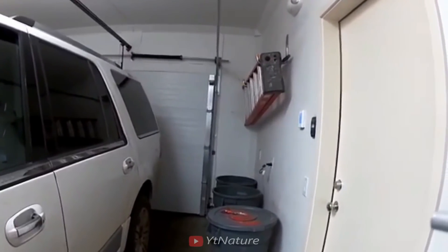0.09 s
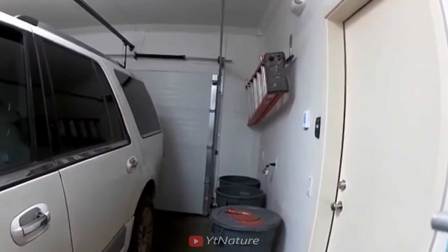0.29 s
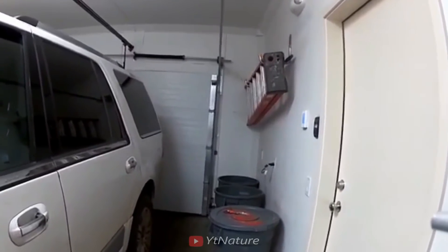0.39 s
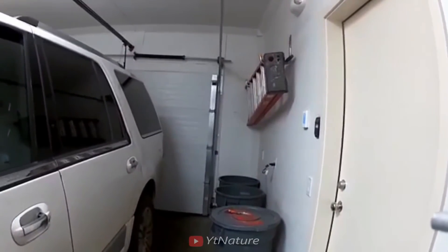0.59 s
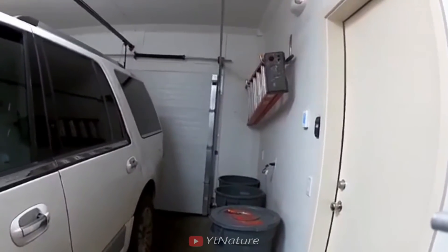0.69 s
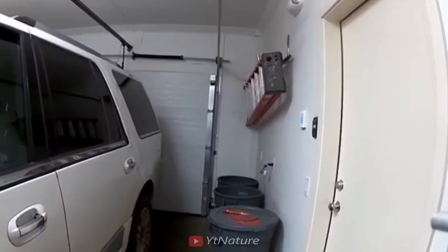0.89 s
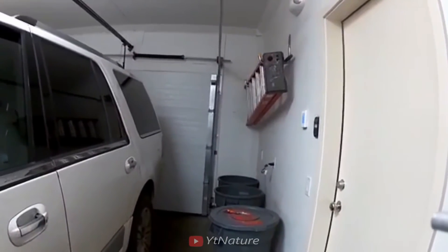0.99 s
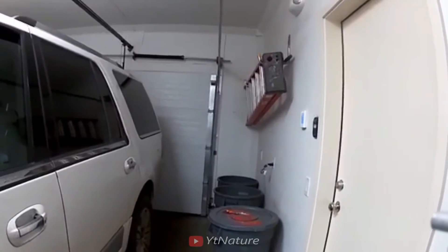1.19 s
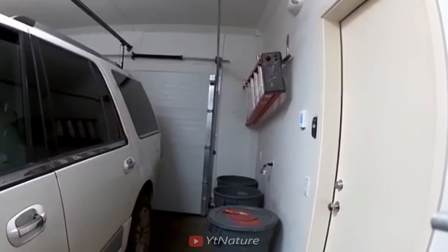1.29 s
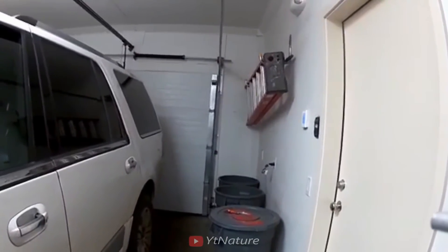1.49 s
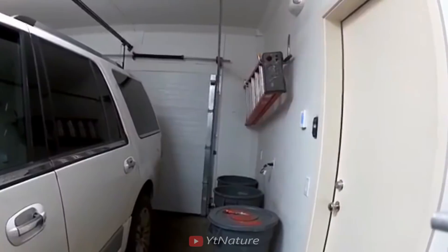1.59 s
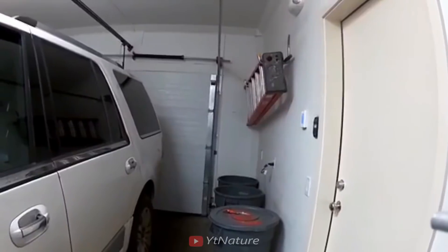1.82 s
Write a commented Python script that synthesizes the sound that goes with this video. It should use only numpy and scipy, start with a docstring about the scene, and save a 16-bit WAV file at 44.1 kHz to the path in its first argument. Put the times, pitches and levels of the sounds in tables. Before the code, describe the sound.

A big garage door rattles in its frame during an earthquake. Soft thuds and clanks build from 0.2 seconds to a hard, clattering bang near 0.6, with a very faint hinge squeak just before. It eases by 0.8, knocks again around 1.0, ticks near 1.1, then thuds strongly around 1.55 and weaker to the end. Low rumble, flickering rattle, short bare-room echo, dull near-mono sound, faint hiss.

```python
"""A big sectional garage door thuds in its frame as an earthquake shakes it, hardest about 0.6 s in.
Steel tracks and hinges clank, small hard things tick nearby, and a hinge squeaks faintly twice.
Each blow is a chatter of random contacts ringing a set of resonances, with a short tail from the bare room.
Shaped noise makes the low rumble and flickering rattle between the blows, and the hiss.
The sound is dull and nearly mono, with the stereo spread growing towards the treble."""
import sys
import numpy as np
from scipy import signal
from scipy.fft import rfft, irfft, next_fast_len
from scipy.io import wavfile
from scipy.ndimage import uniform_filter1d, map_coordinates

SR = 44100
rng = np.random.default_rng(int(sys.argv[2]) if len(sys.argv) > 2 else 0)


def unload_audio(sound):
    """Save the sound as a 16-bit wav file, at the path given as the first command line argument."""
    columns = np.transpose(np.atleast_2d(sound))
    # keep every value between -1 and 1, then stretch to whole-number steps
    steps = np.round(np.clip(columns, -1, 1) * 32767)
    wavfile.write(sys.argv[1], SR, steps.astype(np.int16))


N = 83790
BLOW_SIZE = 16384  # samples

# Thuds of the door. Each row: start in seconds, level in dB, favoured pitch in Hz, boom in dB,
# slap in dB, t60 of the shudder in seconds.
THUDS = [(0.0, -27.5, 140.4, 12.5, -4, 0.033), (0.019, -26, 373, -7, -11, 0.26),
         (0.201, -19.5, 290, 1, -6.5, 0.1), (0.243, -29.5, 266, -12.5, 13.5, 0.16),
         (0.298, -31.5, 534, -13, 10, .08), (0.387, -14, 518, 12, 5.5, 0.076),
         (0.401, -14, 166.6, -5, 5.5, 0.021), (0.426, -18, 161, -5, -3, 0.024),
         (0.493, -23.5, 266, -9.5, 3.5, .05), (0.499, -14, 240, 9.5, 4, 0.023),
         (0.516, -22.5, 154.4, -1.5, 11, 0.093), (0.532, -25.5, 156, 5, -6, 0.025),
         (0.57, -26, 139, 2.5, 3, 0.24), (0.608, -4.5, 240, -6.5, 3, 0.13),
         (0.620, -9.5, 250, -7.5, 4.5, .07), (0.642, -10, 267, -12, -3.5, 0.12),
         (0.703, -26, 269, -14.5, 2, 0.063), (0.748, -27, 272, -7, -7, 0.038),
         (0.765, -20.5, 206, 14, -7.5, .02), (0.785, -24, 273, -10.5, -10.5, 0.095),
         (0.959, -31, 278, -2.5, 3, .08), (0.984, -27, 229, 3, 0.5, 0.067),
         (1.001, -19.5, 317, -11.5, -12, 0.058), (1.010, -17.5, 620, -4.5, -0.5, 0.059),
         (1.018, -16.5, 294, 1.5, 4, 0.035), (1.057, -26.5, 366, -3.5, -28, 0.027),
         (1.168, -36.5, 756, -8, 16, 0.017), (1.257, -29.5, 369, -4, 1.5, 0.15),
         (1.286, -34, 380, -7, -4, 0.04), (1.377, -23, 301, -6, -8.5, 0.08),
         (1.392, -26, 330, -1.5, -20.5, 0.036), (1.417, -26.5, 340, 2, 3.5, 0.054),
         (1.456, -19.5, 310, -4.5, 5, 0.054), (1.545, -15, 318, -8, 3, 0.018),
         (1.585, -16.5, 272, 16.5, 13, .05), (1.598, -16.5, 207, -2.5, -12, .06),
         (1.637, -27.5, 134, -1.5, 0, 0.073), (1.679, -33.5, 362, -14, 5.5, 0.17),
         (1.745, -28, 218, 10.5, 12, 0.14), (1.835, -29, 209, 8, -6.5, 0.059),
         (1.857, -22.5, 276, 8, -6.5, 0.17), (1.882, -28.5, 350, -8, 1, .1)]
# Resonances of the door panels. Each row: centre in Hz, width in Hz (at -4.5 dB), peak in dB.
DOOR_MODES = [(120.2, 31, -6.5), (155, 26, 0), (203, 44, -1.5), (250, 31, 1), (282, 25, 0), (330, 12, -3.5),
              (372.5, 44, -2.5), (473, 90, -8), (529.8, 24.5, -2), (594, 61, -9), (737.4, 37, -12.5),
              (863.5, 35, -17), (998, 50, -18)]
# Dense weak modes between them. Each row: frequency in Hz, level in dB.
DOOR_WASH = [(30, -26), (70, -17), (250, -27.5), (700, -26), (1100, -31), (2000, -34.5), (4000, -59)]
BOOM_BELOW_HZ, SLAP_ABOVE_HZ, THUD_SOFT_HZ = 182, 484, 2070
THUD_FOCUS_DB, THUD_FOCUS_OCTAVES = 8.5, 0.18
THUD_RISE_S, THUD_WET_DB = 0.0022, -8.5


def door():
    """The panels thud in their frame: heavy shoves boom, hard contacts slap."""
    out = np.zeros(N)
    hz = np.fft.rfftfreq(BLOW_SIZE, 1 / SR)
    panels = body(DOOR_MODES, DOOR_WASH, hz) * np.sqrt(below(hz, THUD_SOFT_HZ))
    for start_s, db, pitch_hz, boom_db, slap_db, t60_s in THUDS:
        colour = amp(boom_db * below(hz, BOOM_BELOW_HZ) + slap_db * above(hz, SLAP_ABOVE_HZ))
        colour *= favour(hz, pitch_hz, THUD_FOCUS_DB, THUD_FOCUS_OCTAVES)
        thud = blow(panels * colour, THUD_RISE_S, t60_s, first=0.58)
        add(out, start_s, amp(db) * in_garage(thud, THUD_WET_DB))
    return out


# Clanks of the steel. Each row: start in seconds, level in dB, favoured pitch in Hz,
# brightness in dB, t60 of the chatter in seconds.
CLANKS = [(0.023, -37, 1470, -16, 0.089), (0.064, -36, 1243, 8.5, 0.11), (0.099, -40.5, 1335, -10.5, 0.12),
          (0.172, -45.5, 1260, -2.5, 0.082), (0.212, -26.5, 1800, -3, 0.14), (0.243, -30, 1507, 2.5, 0.15),
          (0.279, -32, 1400, 8, 0.049), (0.387, -25.5, 1588, -24, 0.067), (0.403, -37, 1555, 21.5, 0.024),
          (0.425, -41, 1480, 10, .05), (0.462, -37.5, 1630, -6.5, 0.047), (0.489, -25.5, 1286, 7.5, 0.13),
          (0.519, -34.5, 1890, 15, .07), (0.545, -17.5, 1540, -3.5, 0.14), (0.576, -26, 1470, -7.5, .08),
          (0.602, -26.5, 1560, 3.5, .06), (0.612, -21, 1512, 17.5, 0.06), (0.625, -22.5, 1803, 6.5, 0.092),
          (0.644, -23, 1300, -1, 0.13), (0.658, -22, 1840, -3, 0.054), (0.69, -28, 1475, -6.5, .05),
          (0.895, -40, 1248, 4.5, 0.34), (0.982, -35, 1860, 1.5, 0.23), (1.01, -30.5, 1420, -8.5, 0.1),
          (1.061, -39, 1860, 16.5, 0.082), (1.085, -32, 1595, 15, 0.11), (1.166, -40.5, 1388, 8.5, 0.012),
          (1.259, -39, 1270, -5.5, 0.05), (1.38, -41.5, 1512, -8, 0.15), (1.411, -41.5, 2000, -5, 0.018),
          (1.427, -34, 1250, -5.5, 0.029), (1.457, -31, 1280, 5.5, 0.025), (1.526, -27, 2000, 3, 0.042),
          (1.546, -19.5, 1720, -16.5, 0.031), (1.587, -29, 1420, -37, 0.027), (1.633, -60, 1469, 0, .1),
          (1.68, -49, 1860, 13, 0.17), (1.708, -38, 1523, 6, 0.15), (1.744, -36.5, 1750, -5, 0.043),
          (1.84, -34, 1650, 8, 0.19), (1.858, -30.5, 1380, 4, .11)]
# Resonances of the steel. Each row: centre in Hz, width in Hz (at -4.5 dB), peak in dB.
STEEL_MODES = [(1260, 38, 4), (1478.4, 32, 0.5), (1512, 23, 3.5), (1572, 57, -4.5), (1607, 90, -4),
               (1806, 55, 1.5), (2021, 40, -2), (2310, 110, -10.5), (2696, 280, -20.5), (3230, 140, -20)]
# Dense weak modes between them. Each row: frequency in Hz, level in dB.
STEEL_WASH = [(200, -46), (800, -12.5), (1500, -8), (2100, -11.5), (2600, -33), (3600, -36.5),
              (5000, -44.5), (6500, -42.5), (8000, -45)]
CLANK_BRIGHT_HZ, CLANK_FOCUS_DB, CLANK_FOCUS_OCTAVES = 2530, 7, 0.088
CLANK_RISE_S, CLANK_WET_DB = 0.002, -8.5


def tracks():
    """Rollers and hinges chatter against the steel tracks and ring their modes."""
    out = np.zeros(N)
    hz = np.fft.rfftfreq(BLOW_SIZE, 1 / SR)
    steel = body(STEEL_MODES, STEEL_WASH, hz)
    for start_s, db, pitch_hz, bright_db, t60_s in CLANKS:
        colour = amp(bright_db * above(hz, CLANK_BRIGHT_HZ))
        colour *= favour(hz, pitch_hz, CLANK_FOCUS_DB, CLANK_FOCUS_OCTAVES)
        clank = blow(steel * colour, CLANK_RISE_S, t60_s, first=0.28)
        add(out, start_s, amp(db) * in_garage(clank, CLANK_WET_DB))
    return out


# Ticks close by. Each row: start in seconds, level in dB, brightness in dB.
TICKS = [(0.212, -28.5, -27), (0.266, -36, -4.5), (0.341, -40, 1.5), (0.405, -40.5, 7.5),
         (0.729, -33.5, -5), (0.805, -46, -10), (1.119, -28, 5), (1.165, -40, -5.5), (1.227, -40.5, -0.5),
         (1.411, -35.5, -20.5), (1.497, -32.5, 4), (1.55, -34, -2.5)]
# Resonances of the small object. Each row: centre in Hz, width in Hz (at -4.5 dB), peak in dB.
TICK_MODES = [(1410, 100, 2.5), (1995, 140, 9.5), (2340, 130, 2.5), (2780, 540, -11.5), (3305, 204, -2.5),
              (4200, 770, -21.5), (5700, 190, -16), (6310, 490, -16.5)]
TICK_BRIGHT_HZ, TICK_RISE_S, TICK_T60_S, TICK_WET_DB = 2800, 0.00098, 0.011, -14.5


def ticks():
    """A small hard object taps close by: a strong first contact and little room."""
    out = np.zeros(N)
    hz = np.fft.rfftfreq(BLOW_SIZE, 1 / SR)
    wash = [(200, -35), (2000, -27), (5000, -47), (7000, -35.5)]  # (Hz, dB)
    shell = body(TICK_MODES, wash, hz)
    for start_s, db, bright_db in TICKS:
        colour = amp(bright_db * above(hz, TICK_BRIGHT_HZ))
        tick = blow(shell * colour, TICK_RISE_S, TICK_T60_S, first=1.36)
        add(out, start_s, amp(db) * in_garage(tick, TICK_WET_DB))
    return out


# Squeaks of a hinge. Each row: start in seconds, level in dB.
SQUEAKS = [(0.42, -60), (0.513, -49.5)]
SQUEAK_HZ, SQUEAK_HALF_WIDTH_HZ, SQUEAK_S = 6100, 230, 0.028


def hinge():
    """Rubbing steel squeaks thinly: narrow-band noise under half-sine swells."""
    t = np.arange(N) / SR
    swell = np.zeros(N)
    for start_s, db in SQUEAKS:
        swell += amp(db) * np.sin(np.pi * np.clip((t - start_s) / SQUEAK_S, 0, 1))
    band = lambda hz: np.exp(-((hz - SQUEAK_HZ) / SQUEAK_HALF_WIDTH_HZ) ** 2)
    return swell * unit(filtered(rng.standard_normal(N), band))


# Shaking between the blows. Each row: time in seconds, rumble level in dB, rattle level in dB.
SHAKING = [(0, -34.5, -33.5), (0.121, -45, -37), (0.17, -46.5, -38.5), (0.3, -41, -31.5),
           (0.37, -42.5, -38), (0.47, -44, -34), (0.519, -25, -35.5), (0.62, -42.5, -21.5),
           (0.8, -44.5, -36.5), (0.92, -37.5, -43), (1.098, -41, -36.5), (1.2, -40.5, -44.5),
           (1.36, -39, -42), (1.52, -44, -36.5), (1.7, -40, -36), (1.8, -41.5, -39), (1.9, -50.5, -25.5)]
# Spectrum of the rumble. Each row: frequency in Hz, relative density in dB per Hz.
RUMBLE_SPECTRUM = [(15, -6), (40, 5), (57, 0), (85, -8.5), (150, -2), (300, -45.5)]
# Spectrum of the rattle. Each row: frequency in Hz, relative density in dB per Hz.
RATTLE_SPECTRUM = [(70, -23), (130, 3), (240, 0.5), (400, 0), (600, -9), (760, -7), (900, -12),
                   (1130, -30.5), (1260, -7), (1380, -13.5), (1550, -13), (2250, -15), (2700, -33),
                   (3400, -29.5), (4500, -37.5), (7000, -46.5)]


def shaking():
    """The building rumbles and far fittings rattle without a break, the rattle flickering in level."""
    s, *levels = np.transpose(SHAKING)
    rumble_db, rattle_db = [np.interp(np.arange(N) / SR, s, level) for level in levels]
    flicker_db = 0.83 * wobble(12) + 2.7 * wobble(70)
    rattle = unit(noise(RATTLE_SPECTRUM) * amp(flicker_db))
    return amp(rumble_db) * noise(RUMBLE_SPECTRUM) + amp(rattle_db) * rattle


CONTACTS_PER_S, SCRAPE_SHARE = 1200, 0.047  # chatter rate; scraping size relative to a contact


def blow(gain, rise_s, t60_s, first):
    """A first contact and a dying chatter ring a body evenly; the energy is that of 20 ms at rms 1."""
    t = np.arange(BLOW_SIZE) / SR
    hits = rng.random(BLOW_SIZE) < CONTACTS_PER_S / SR
    contacts = rng.standard_normal(BLOW_SIZE) * (SCRAPE_SHARE + hits)
    chatter = contacts * amp(-60 * t / t60_s) * (1 - np.exp(-t / rise_s))
    force = rfft(chatter / np.linalg.norm(chatter) + first * (t == 0))
    # Even out the broad colour of the force, then ring the body with minimum phase.
    broad_colour = np.sqrt(np.abs(uniform_filter1d(np.abs(force) ** 2, size=40)) + 1e-6)
    cepstrum = irfft(np.log(gain / broad_colour + 1e-6))
    half = BLOW_SIZE // 2 - 1
    fold = np.r_[1, np.full(half, 2), 1, np.zeros(half)]
    sound = irfft(force * np.exp(rfft(cepstrum * fold)))
    return sound / np.linalg.norm(sound) * np.sqrt(0.02 * SR)


def body(modes, wash, hz):
    """Gain of a set of resonances over a wash of weak modes."""
    power = amp(along(wash, hz)) ** 2
    for centre_hz, width_hz, db in modes:
        detune = (hz * hz - centre_hz * centre_hz) / (hz * width_hz + 1)
        power = power + amp(db) ** 2 / (1 + detune ** 2) ** 1.5
    return np.sqrt(power)


def favour(hz, centre_hz, db, octaves):
    """Where a blow lands decides which modes ring most: a bell-shaped boost in dB."""
    return amp(db * np.exp(-0.5 * (np.log2((hz + 1) / centre_hz) / octaves) ** 2))


def below(hz, edge_hz):
    """A soft step from 1 below an edge to 0 above it."""
    return 1 / (1 + (hz / edge_hz) ** 6)


def above(hz, edge_hz):
    """A soft step from 0 below an edge to 1 above it."""
    return 1 - below(hz, edge_hz)


# Reverberation of the bare room. Each row: frequency in Hz, t60 in seconds.
GARAGE = [(100, 0.23), (400, 0.23), (1500, 0.37), (6000, 0.41)]


def in_garage(sound, wet_db):
    """A sound with its own diffuse tail from the bare walls: noise decaying at a rate set by frequency."""
    hz, t, grains = signal.stft(rng.standard_normal(SR // 2), SR, nperseg=256)
    decay = amp(-60 * t / along(GARAGE, hz)[:, None])
    tail = signal.istft(grains * decay, SR, nperseg=256)[1]
    echo = signal.fftconvolve(sound, np.pad(tail, (SR // 200, 0)))  # 5 ms before the walls answer
    echo *= amp(wet_db) * np.linalg.norm(sound) / np.linalg.norm(echo)
    return echo + np.pad(sound, (0, len(echo) - len(sound)))


def amp(db):
    """Decibels to gain."""
    return 10 ** (np.asarray(db) / 20)


def unit(x):
    """Scaled to rms 1."""
    return x / np.sqrt(np.mean(x ** 2) + 1e-20)


def along(points, hz):
    """(Hz, value) points read on a log axis."""
    f, v = np.transpose(points)
    return np.interp(np.log(hz + 1), np.log(f + 1), v)


def filtered(x, response):
    """x times a response of frequency."""
    size = next_fast_len(N + SR // 2)
    spectrum = rfft(x, size) * response(np.fft.rfftfreq(size, 1 / SR))
    return irfft(spectrum, size)[..., :N]


def add(track, start_s, sound):
    """Mix a sound into a track at a time."""
    start = int(np.clip(round(start_s * SR), 0, N - 1))
    track[start:start + len(sound)] += sound[:N - start]


def wobble(knots_per_s):
    """A smooth random curve through evenly spaced random knots."""
    knots = rng.standard_normal(int(N * knots_per_s / SR) + 4)
    return map_coordinates(knots, [np.arange(N) * knots_per_s / SR])


def noise(spectrum):
    """Noise of rms 1 with a given spectrum."""
    return unit(filtered(rng.standard_normal(N), lambda hz: amp(along(spectrum, hz))))


# Stereo spread. Each row: frequency in Hz, side over mid in dB.
WIDTH = [(60, -56), (170, -49.5), (300, -41.5), (510, -31.5), (1490, -19), (2540, -15.5), (5000, -8),
         (7000, -5.5)]


def scene():
    """Everything together; a side signal a quarter cycle from the mid spreads mainly the treble."""
    mid = door() + tracks() + ticks() + hinge() + shaking()
    side = filtered(mid, lambda hz: 1j * amp(along(WIDTH, hz)))
    return np.array([mid - side, mid + side])


# Spectrum of the hiss. Each row: frequency in Hz, relative density in dB per Hz.
HISS_SPECTRUM = [(500, 2.5), (2500, -4.5), (5000, -8), (6500, 6), (8000, 6)]
HISS_DB, CEILING, TOP_HZ = -63, 0.6, 7000


def record(dry):
    """The microphone adds hiss, rounds off the highest peaks and cuts steeply above its band limit."""
    x = dry + amp(HISS_DB) * noise(HISS_SPECTRUM)
    x = x / (1 + np.abs(x / CEILING) ** 6) ** (1 / 6)
    return filtered(x, lambda hz: 1 / np.sqrt(1 + (hz / TOP_HZ) ** 70))


dry = scene()
out = record(dry)
unload_audio(out)
```